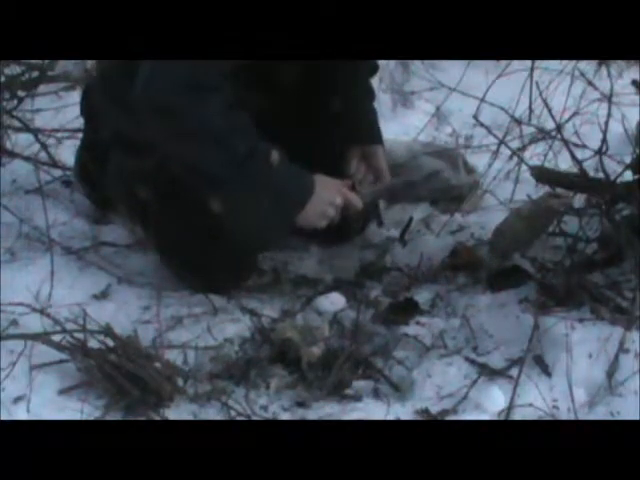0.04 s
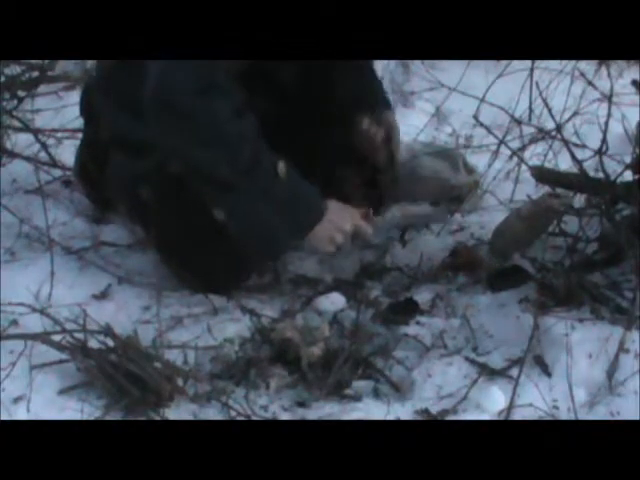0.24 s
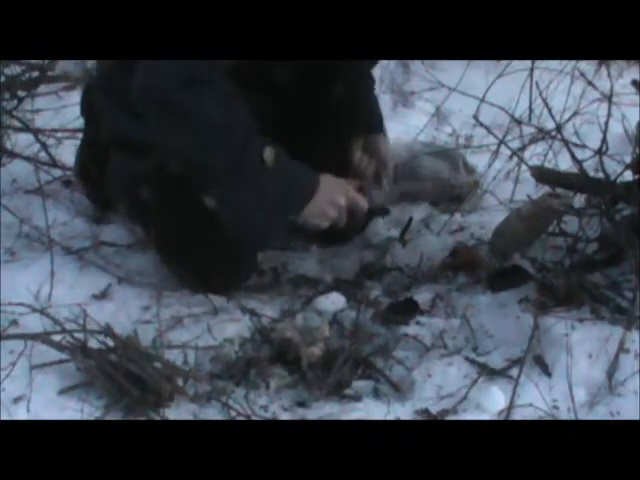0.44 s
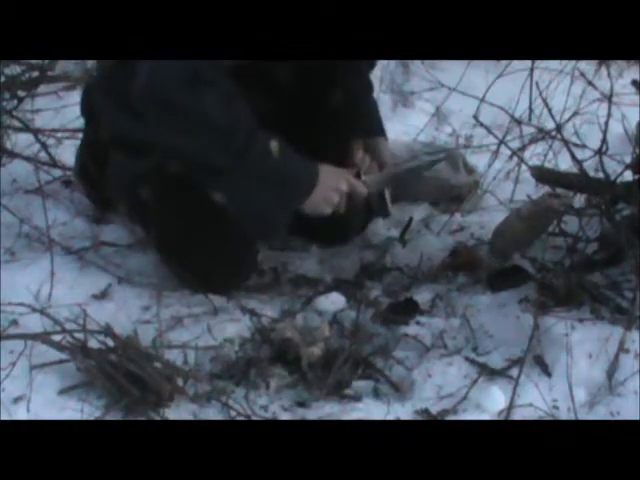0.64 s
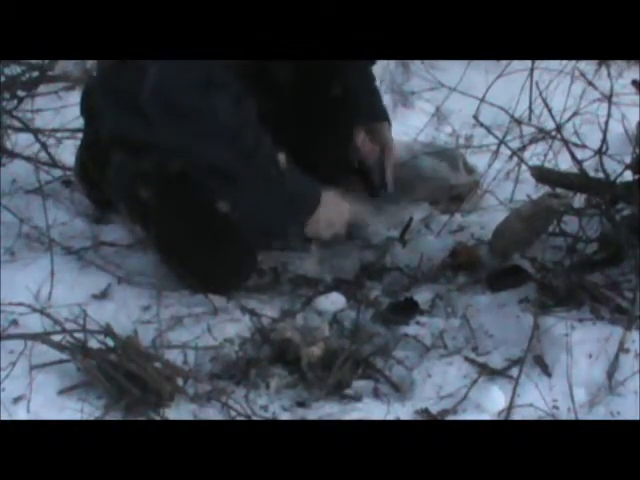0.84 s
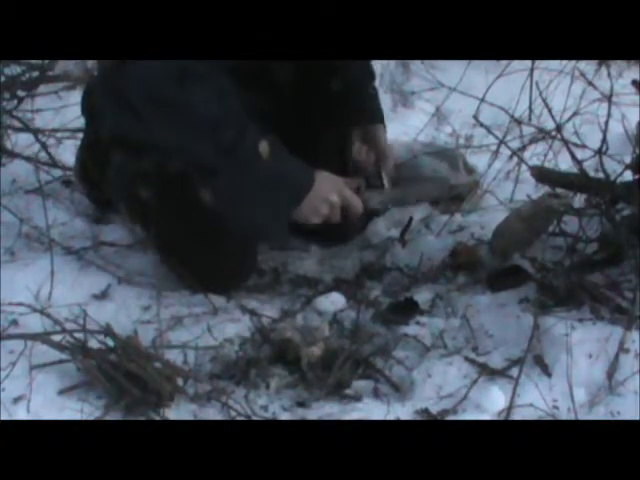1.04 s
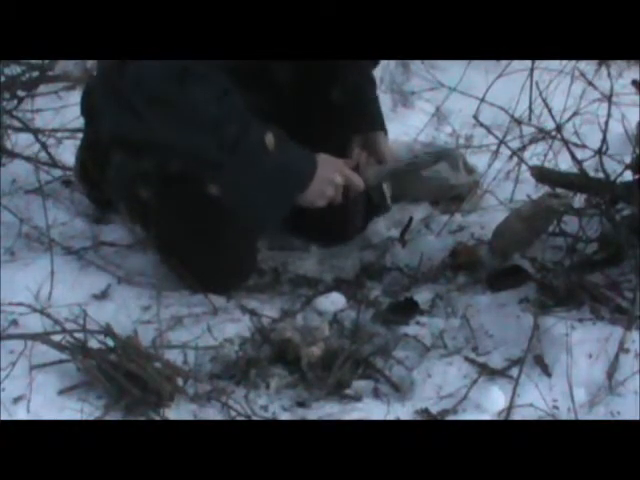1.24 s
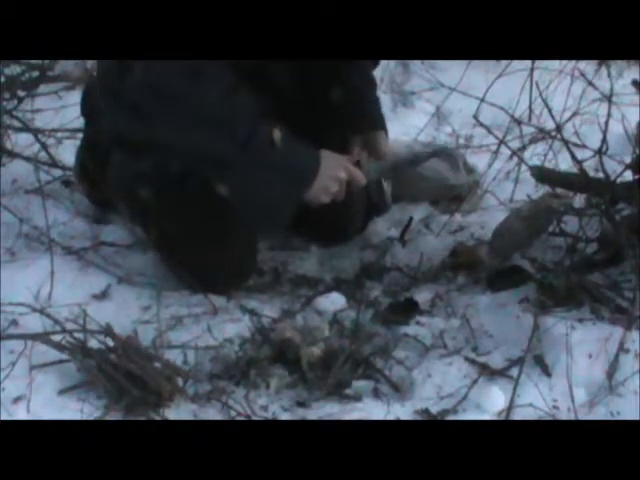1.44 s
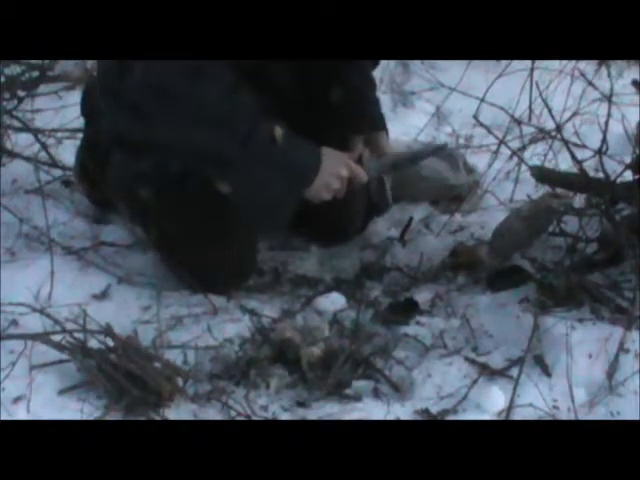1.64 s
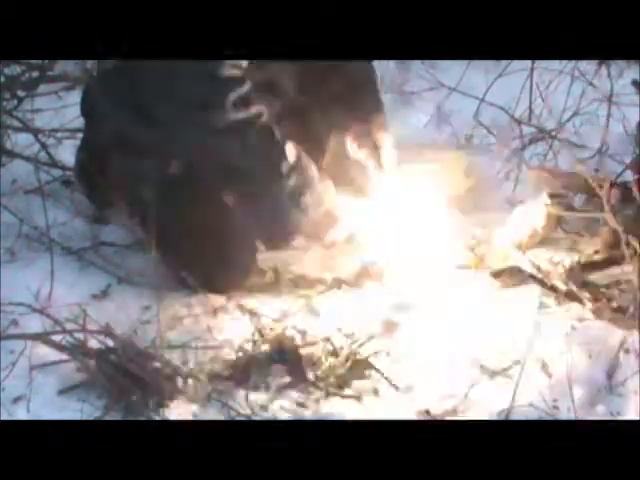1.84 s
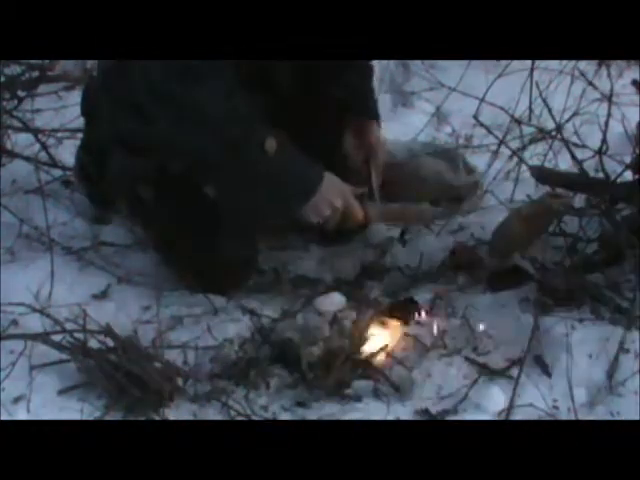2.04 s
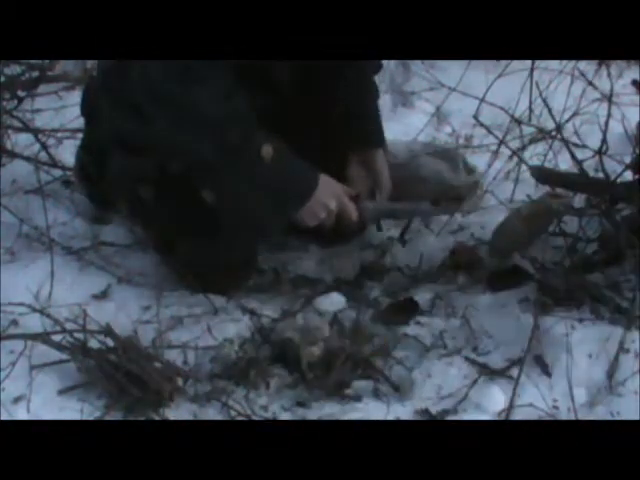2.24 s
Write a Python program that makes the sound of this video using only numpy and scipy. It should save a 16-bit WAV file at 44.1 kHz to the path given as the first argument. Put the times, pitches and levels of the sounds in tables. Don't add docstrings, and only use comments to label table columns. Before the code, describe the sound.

Close stereo microphone in quiet snowy woods: quick, gritty, bright metal strokes with small clicks between them, the last bursting into sizzling sparks and tiny crackles; low distant rumble, hiss and faint cloth thumps underneath.

```python
import sys
import numpy as np
from scipy import signal
from scipy.fft import rfft, irfft, next_fast_len
from scipy.io import wavfile
from scipy.ndimage import uniform_filter1d, minimum_filter1d

SR = 44100
rng = np.random.default_rng(int(sys.argv[2]) if len(sys.argv) > 2 else 0)


def amplitude_ratio(level_db):
    exponent = np.asarray(level_db, float) / 20
    return 10 ** exponent


def generate_wav(signal):
    frames = np.transpose(np.atleast_2d(signal))
    scaled = np.clip(frames, -1, 1) * 32767
    pcm = np.round(scaled).astype(np.int16)
    wavfile.write(sys.argv[1], SR, pcm)


N = 101429

# frequency in Hz, level in dB.
WOODS_TONE = [(15, -34), (25, -18.5), (53, 4), (108, -4), (175, -3.5), (600, -5.5), (1000, -9.5),
              (3400, -23.5), (16000, -26)]
# frequency in Hz, coherence from 0 to 1.
WOODS_SAME = [(60, 1), (180, 1), (550, 0.97), (1650, 0.027), (4970, 0.61), (15000, 0.85)]
# frequency in Hz, phase in radians.
WOODS_LEAD = [(0, 0), (1810, 0.99), (4570, 0.39), (7750, 0.41), (9560, 0.54), (16500, -0.0)]
# frequency in Hz, left over right in dB.
WOODS_LEAN = [(60, 0), (380, -0.9), (2380, -0.5), (15000, -2.5)]
# pitch in Hz, level in dB, start in seconds, end in seconds.
MOTOR = [
    (279.4, -59.5, 0, 0.65),
]
# centre time in seconds, level in dB, pitch in Hz.
THUMPS = [
    (0.092, -42, 71),
    (.165, -46, 72),
    (1.045, -43.5, 45),
    (1.547, -38, 67),
    (1.79, -46, 70),
]

# time in seconds, pressure in dB, load on the handle in dB.
STROKES = [
    [(.212, -49, -10), (.222, -29.5, -19), (.229, -19, -48), (.236, -14, -45), (.243, -13, -30),
     (.253, -18.5, -19.5), (.26, -10.5, -15), (.266, -31, -39), (.272, -59, -16)],
    [(.858, -73, -17), (.864, -41, -3), (.87, -57, -33), (.875, -51, 11), (.885, -32, -14),
     (.893, -27.5, 7), (.899, -28, -6), (.903, -37, -3), (.92, -65, 8)],
    [(1.41, -69, -6), (1.44, -55.5, -4), (1.478, -48.5, -26), (1.5, -46.5, -14), (1.516, -63, -8),
     (1.525, -54, -11)],
    [(1.82, -61, -6), (1.83, -64, 4), (1.846, -52, 3), (1.862, -33, -17), (1.866, -45, 3),
     (1.876, -29.5, -5.5), (1.883, -28.5, -0.5), (1.888, -34, -30), (1.895, -49, -12)],
]
SPOTS = [
    (-30, -6, -5, -15, -17),
    (-26, -8, -4, -12, -15),
    (-26, -11, -1, -14, -28),
    (-24, -8, -1, -18, -18),
    (-15, -1, -5, -28, -20),
    (-14, -2, -6, -16, -15),
]
SCRATCH_DB = [-10, 2, -6, 1.5]
RUB_DB = [-10.5, -5, 5, -6]
GRIP = [1.15, 1.05, .95, 1.0, .7, .85]
# pitch factor as a ratio, body in dB, top in dB.
TINT = [
    (1.1, -1, 7),
    (1.08, -6, 11),
    (.97, 6, -2),
    (1.0, 0, 6),
    (1.04, 11, 10),
    (.86, 11, 3),
]
# pitch in Hz, time to fall 60 dB in seconds.
BLADE = [(3830, .018), (6390, .027), (9470, .05), (12410, .09), (15310, .09)]
# pitch in Hz, level in dB, time to fall 60 dB in seconds.
EDGE = [(4700, -6, 0.014), (7950, -33.5, 0.036), (8500, -2, 0.042), (11560, 4, 0.015), (13600, -9, 0.026)]
# pitch in Hz, level in dB, time to fall 60 dB in seconds.
HANDLE = [(816, -1.5, 0.058), (1470, -6.5, 0.018), (1747, -5.5, 0.024), (2900, -9.5, 0.029),
          (3288, -4, 0.0098), (3725, -9.5, 0.028), (4540, -10.5, 0.005), (5200, -13.5, 0.014)]
# time in seconds, crack in dB, blade ring in dB, handle knock in dB,
# handle colour in Hz.
SLIPS = [
    [(.2285, -28, -14, -26, 3800), (.2325, -27, -10, -10, 3650), (.2385, -14, 3, -26, 3300),
     (.2435, -24, 0, -22, 3100), (.2545, -24, -5, -19, 1500), (.2615, -18, 2.5, -3, 3250)],
    [(.8635, -35, -30, -35, 3000), (.8722, -30, -23, -24, 1700), (.8795, -36, -16, -17, 3400),
     (.886, -29, -14, -13, 800), (.8912, -26, -12, -10, 1400), (.8945, -23, -8, -8, 1750),
     (.8955, -22, -7, -9, 2900), (.8992, -24, -6, -22, 4600)],
    [(1.4845, -44, -30, -36, 4500), (1.503, -52, -32, -41, 5000), (1.514, -56, -30, -44, 5000)],
    [(1.8265, -56, -33, -50, 3600), (1.858, -29, -22, -40, 4800), (1.8645, -10, -3, -18, 3500),
     (1.8685, -26, -4, -20, 3100), (1.8745, -30, -6, -15, 1750), (1.8785, -28, -5, -13, 1200),
     (1.8808, -32, -5, -9, 3800), (1.882, -34, -6, -11, 1850), (1.8842, -11, -10, -24, 5200)],
    [(.6627, -22, -9, -13, 3250), (.6636, -25, -12, -9, 3850)],
    [(1.299, -33, -18, -21, 3200)],
]
TOUCH = [
    [(1, 9, 8, 3), (4, 8, 6, 9), (-15, -3, 11, 0), (-9, 1, 7.5, 1), (4.5, -15, 8, 7), (-4.5, -12, 15, -7)],
    [(0, 1, -10, 0), (7, 3, -4, 3), (10, -12, -6, -6), (9, 2, 2, 0), (8, 0, 3, 0), (6, 0, 6, 0),
     (8, 0, 7, 0), (-14, 4, 5, 1)],
    [(15, 0, 2, 0), (4, 0, -3, 0), (7, 1, -8, 0)],
    [(-8, 0, -6, -6), (-8, 2, 8, -8), (-1, 2, 4, 0), (-3, 2, 0, -5), (-7, 0, 2, -2), (6, 0, -3, 2),
     (5, 0, -3, 2), (6, 0, -3, 2), (-3, 2, 0, 14)],
    [(0, 1.8, 3, -3), (0, 0.7, 6, 2)],
    [(0, -1.8, 0, 0)],
]
# frequency in Hz, density in dB per Hz.
SCRATCH_TONE = [(590, -82), (1000, -37), (2360, -17), (3460, -9.5), (4520, -8.5), (9280, 20), (11200, -3.5),
                (16000, -4)]

# start in seconds, flare in seconds, burn in seconds, level in dB, fall in dB.
SPARKS = [
    (0.254, 0.01, 0.08, -42, -12),
    (.89, 0.021, 0.071, -52.5, -6),
    (1.852, .04, 0.065, -27, -19),
    (1.915, 0.016, 0.12, -50, -14),
]
# frequency in Hz, level in dB.
FIZZ_TONE = [(700, -16), (1200, -14), (2500, -3), (5000, -2), (8500, 5), (11500, 5), (13500, -3),
             (16000, -7)]
# time in seconds, level in dB, centre frequency in Hz.
POPS = [(1.9045, -30, 9000), (1.9125, -28, 11000), (1.934, -36, 5000), (1.954, -40, 12000),
        (1.9705, -34, 8500), (1.9775, -35, 5500), (1.9845, -39, 9000), (1.991, -41, 7000),
        (1.997, -41, 6000), (2.008, -43, 9500), (2.015, -43, 9500), (2.023, -41, 8000), (2.031, -41, 5000),
        (2.0635, -36, 9500)]

# frequency in Hz, phase in radians.
NEAR_LEAD = [(300, 0.82), (600, 1), (1200, 1), (2300, 0.41), (5000, .05), (15000, .01)]
# frequency in Hz, left over right in dB.
NEAR_LEAN = [(60, 0), (240, 2), (950, 0.5), (3770, -3.5), (15000, -3)]


def evened(x):
    return x / np.sqrt(np.mean(x ** 2) + 1e-20)


def read(points, hz):
    f, value = np.transpose(points)
    return np.interp(np.log(hz + 30), np.log(f + 30), value)


def colour(x, points):
    log_gain = np.log(amplitude_ratio(read(points, np.fft.rfftfreq(1024, 1 / SR))))
    mirrored = np.r_[log_gain, log_gain[-2:0:-1]]
    taps = np.fft.ifft(np.exp(np.conj(signal.hilbert(mirrored)))).real[:512]
    return signal.oaconvolve(x, taps / np.linalg.norm(taps))[:len(x)]


def ring(x, modes):
    t = np.arange(SR // 5) / SR
    rise = 1 - np.exp(-t / 0.0004)
    response = np.zeros(len(t))
    for hz, db, t60 in modes:
        sine = amplitude_ratio(-60 * t / t60) * rise * np.sin(2 * np.pi * hz * t)
        response += amplitude_ratio(db) * sine / np.linalg.norm(sine)
    return signal.oaconvolve(x, response)[:len(x)]


def grains(per_s, spread_db):
    chance, size, sign = rng.random((N, 3)).T
    height = amplitude_ratio(spread_db * np.minimum(-np.log(size + 1e-9), 4))
    return evened((chance < per_s / SR) * height * (sign - .5))


def burst(s, length_s, noise):
    t = np.arange(N) / SR - s
    return np.where(t >= 0, np.exp(-np.abs(t) / length_s), 0) * noise


def woods_bed():
    frames, hz = N // 256 + 5, np.fft.rfftfreq(1024, 1 / SR)
    a, b, c, d, patches = rng.standard_normal((frames, 513, 5)).T
    patches = evened(uniform_filter1d(uniform_filter1d(patches, 8, 0), 16, 1))
    same = np.clip(read(WOODS_SAME, hz), 0, 1)[:, None]
    left, other = a + 1j * b, c + 1j * d
    offset = np.exp(-1j * read(WOODS_LEAD, hz)) / amplitude_ratio(read(WOODS_LEAN, hz))
    right = (same * left + np.sqrt(1 - same ** 2) * other) * offset[:, None]
    spectrum = np.array([left, right]) * amplitude_ratio(read(WOODS_TONE, hz)[:, None] + 0.88 * patches)
    bed = signal.istft(spectrum, nperseg=1024, noverlap=768)[1][:, :N]
    return amplitude_ratio(-46) * evened(bed)


def distant_motor():
    t, out = np.arange(N) / SR, np.zeros(N)
    for hz, db, start, end in MOTOR:
        fade = np.clip((end - t) / 0.14, 0, 1)
        waver = 0.54 * np.sin(2 * np.pi * 5.0 * t)
        throb = 1 + 0.28 * np.sin(2 * np.pi * 8.0 * t)
        out += amplitude_ratio(db + 3.5) * fade * np.sin(2 * np.pi * hz * (t - start) + waver) * throb
    return out


def camera_whine():
    return amplitude_ratio(-68) * np.sin(2 * np.pi * 15734 * np.arange(N) / SR)


def body_thumps():
    t, out = np.arange(N) / SR, np.zeros(N)
    for s, db, hz in THUMPS:
        swell = np.exp(-.5 * ((t - s) * hz / 0.38) ** 2)
        out += amplitude_ratio(db) * swell * np.sin(2 * np.pi * hz * (t - s))
    return out


def glove_catch():
    catch_s, fade_s = 1.888, .004
    return np.exp(-np.maximum(np.arange(N) / SR - catch_s, 0) / fade_s)


def grit_rub(k, grit, modes):
    s, press_db, load_db = np.transpose(STROKES[k])
    t = np.arange(N) / SR
    rub = grit * amplitude_ratio(np.interp(t, s, press_db, -120, -120))
    handle = ring(rub * amplitude_ratio(np.interp(t, s, load_db)), HANDLE[1:])
    blade = amplitude_ratio(RUB_DB[k]) * ring(rub, modes) * glove_catch()
    return rub * amplitude_ratio(SCRATCH_DB[k]), handle + blade


def slip_ring(slip, touch, stop, modes):
    s, _, ring_db, handle_db, centre_hz = slip
    t = np.arange(N) / SR
    blow = 1. * (np.arange(N) == round(s * SR))
    *low, top = [(hz, db + more_db, t60) for (hz, db, t60), more_db in zip(modes, (0, *touch))]
    rung = ring(blow, low) * glove_catch() + ring(blow, [top])
    blade = amplitude_ratio(ring_db) * 2 * rung * np.exp(-np.maximum(t - stop, 0) / .001)
    near = [(hz, db - 6 * (np.log(hz / centre_hz) / 0.2) ** 2, t60) for hz, db, t60 in HANDLE]
    knock = (centre_hz, -4, .004)
    return blade + amplitude_ratio(handle_db) * ring(blow, near + [knock])


def tinted_scratch(k, scratch):
    factor, body_db, top_db = TINT[k]
    tone = []
    for hz, db in SCRATCH_TONE:
        is_body, is_top = abs(np.log(hz / 4520)) < .1, hz > 12000
        tone.append((hz * factor, db + body_db * is_body + top_db * is_top))
    return colour(scratch, tone) + amplitude_ratio(-14.5) * ring(scratch, EDGE)


def knife():
    out = np.zeros(N)
    grit = grains(per_s=14000, spread_db=2.4)
    noise = np.sign(rng.standard_normal(N))
    for k, spot in enumerate(SPOTS):
        modes = [(hz, db, t60 * GRIP[k]) for (hz, t60), db in zip(BLADE, spot)]
        scratch = np.zeros(N)
        if k < len(STROKES):
            scratch, rung = grit_rub(k, grit, modes)
            out += rung
        stops = [slip[0] for slip in SLIPS[k][1:]] + [N]
        for slip, touch, stop in zip(SLIPS[k], TOUCH[k], stops):
            s, crack_db = slip[:2]
            scratch = scratch + amplitude_ratio(crack_db) * burst(s, .001, noise)
            out += slip_ring(slip, touch, stop, modes)
        out += tinted_scratch(k, scratch)
    low_cut = signal.butter(N=4, Wn=600, btype="high", fs=SR, output="sos")
    return signal.sosfilt(low_cut, out)


def burning_shavings():
    t, burn = np.arange(N) / SR, np.zeros(N)
    for s, flare, length, db, fall_db in SPARKS:
        swell = np.clip((t - s) / flare, 0, 1) ** 2
        sag = amplitude_ratio(db + fall_db * np.clip((t - s - flare) / length, 0, 1) ** 2)
        burn += sag * swell * np.clip((s + flare + length - t) / 0.038, 0, 1)
    return colour(burn * grains(per_s=14000, spread_db=3), FIZZ_TONE)


def ember_pops():
    out, noise, width = np.zeros(N), rng.standard_normal(N), .8
    for s, db, hz in POPS:
        tone = [(hz * np.exp(-2 * width), -24), (hz * np.exp(-.5 * width), -3),
                (hz, 0), (hz * np.exp(width), -16)]
        out += colour(amplitude_ratio(db) * burst(s, .0012, noise), tone)
    return out


def ports(x):
    size = next_fast_len(N + SR)
    hz, t = np.fft.rfftfreq(size, 1 / SR), np.arange(SR // 4) / SR
    half = np.sqrt(amplitude_ratio(read(NEAR_LEAN, hz))) * np.exp(.5j * read(NEAR_LEAD, hz))
    direct = irfft(rfft(x, size) * np.array([half, 1 / half]), size)[:, :N]
    echo_db, echo_t60 = -19, 0.046
    tail = rng.standard_normal((len(t), 2)).T * amplitude_ratio(-60 * t / echo_t60) * (t > .004)
    echo = signal.fftconvolve(x[None], tail / np.linalg.norm(tail[0]), axes=1)[:, :N]
    return direct + amplitude_ratio(echo_db) * echo


def scene():
    near = ports(knife() + burning_shavings() + ember_pops())
    far = woods_bed() + distant_motor() + camera_whine() + body_thumps()
    return near + far


def band_limit(x):
    return signal.sosfilt(signal.butter(12, 16970, fs=SR, output="sos"), x)


def record(dry):
    knee_db, squeeze, hold_s, recover_db_per_s = -36.5, 0.28, 0.18, 3
    power = abs(uniform_filter1d((dry ** 2).mean(0), 3001, origin=1400))
    cut_db = squeeze * np.maximum(10 * np.log10(power + 1e-12) - knee_db, 0)
    hold = round(hold_s * SR) // 2 * 2 + 1
    held = -minimum_filter1d(-cut_db, hold, origin=hold // 2)
    recovery = np.arange(N) * recover_db_per_s / SR
    cut_db = np.maximum.accumulate(held + recovery) - recovery
    ducked = dry / amplitude_ratio(uniform_filter1d(cut_db, 2001, origin=1000))
    mix = signal.oaconvolve(ducked, signal.firwin(255, 16000, fs=SR)[None], "same")
    return band_limit(mix)


dry = scene()
out = record(dry)
generate_wav(out)
```